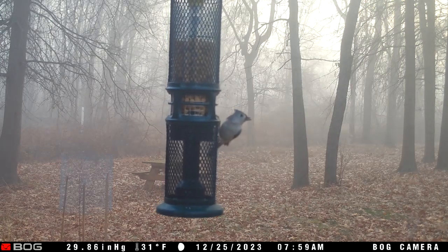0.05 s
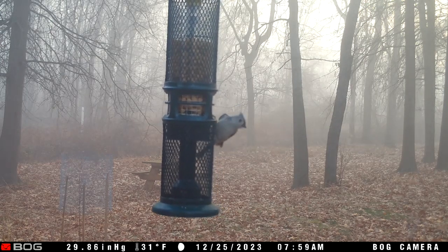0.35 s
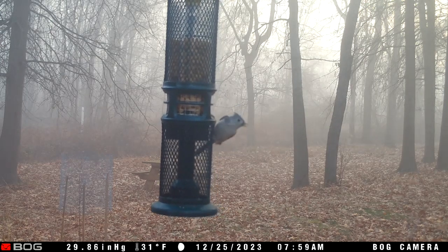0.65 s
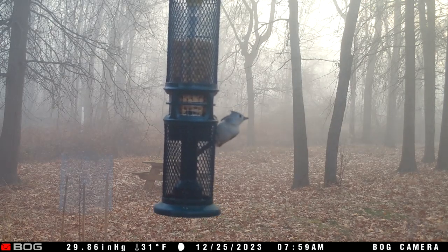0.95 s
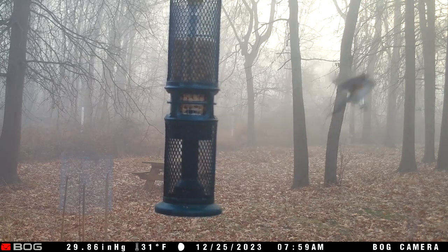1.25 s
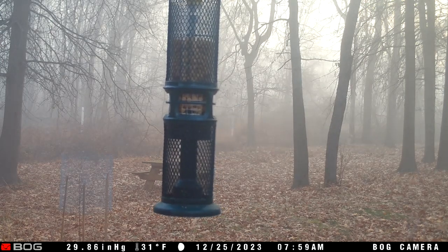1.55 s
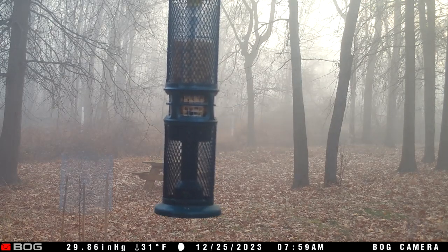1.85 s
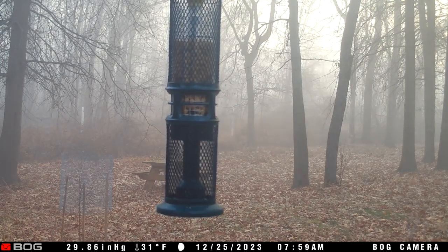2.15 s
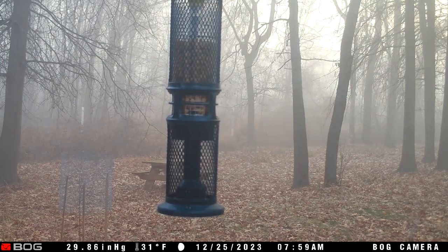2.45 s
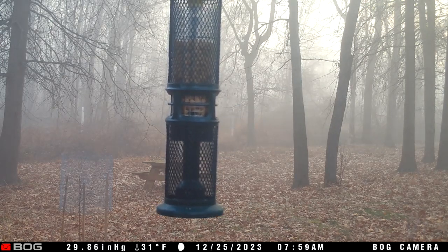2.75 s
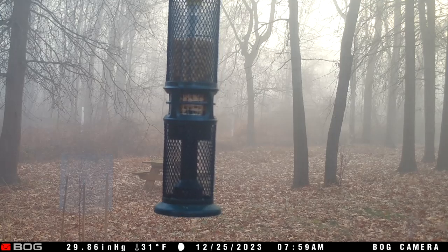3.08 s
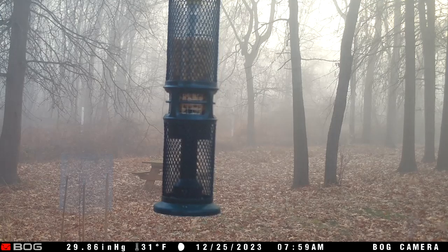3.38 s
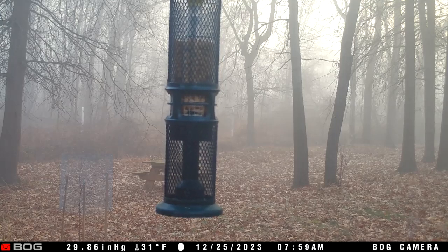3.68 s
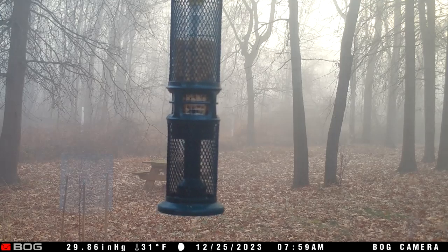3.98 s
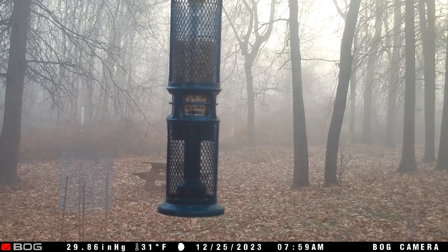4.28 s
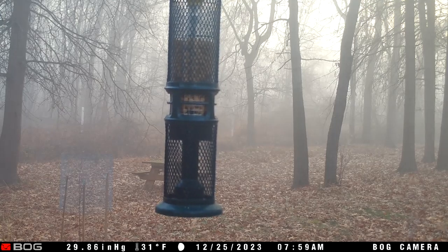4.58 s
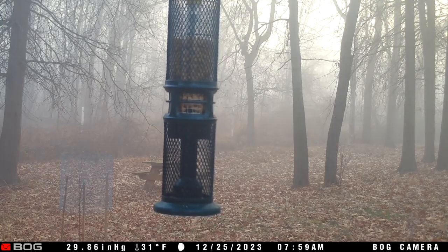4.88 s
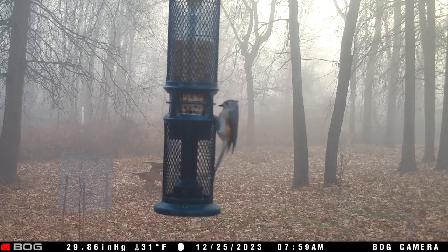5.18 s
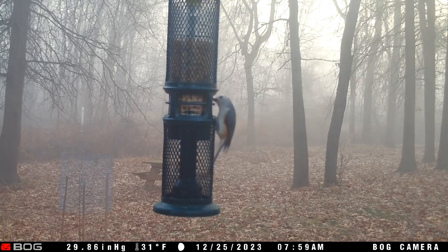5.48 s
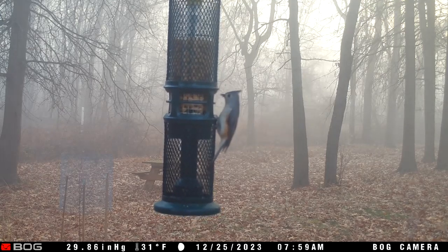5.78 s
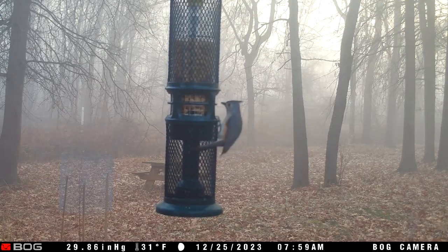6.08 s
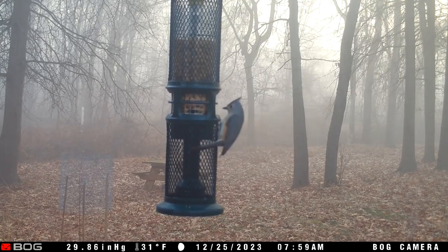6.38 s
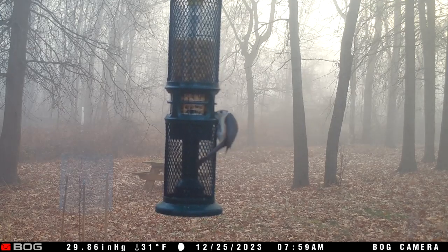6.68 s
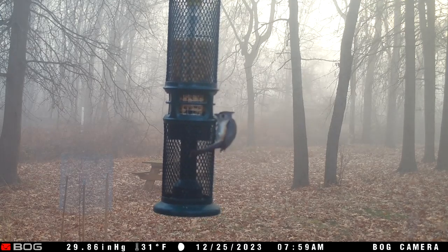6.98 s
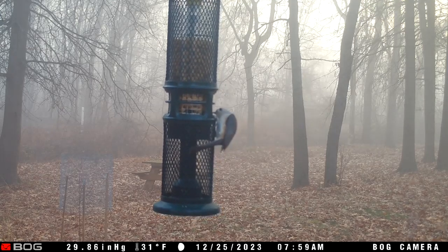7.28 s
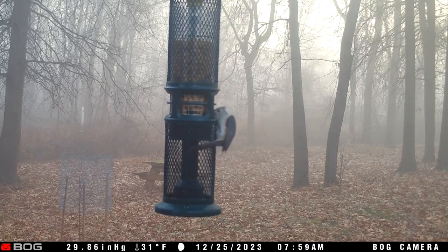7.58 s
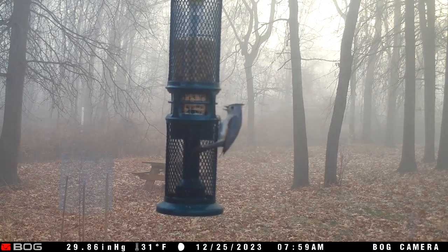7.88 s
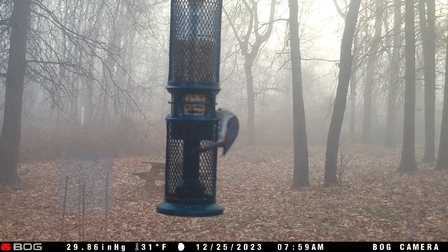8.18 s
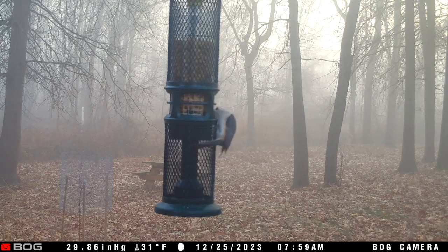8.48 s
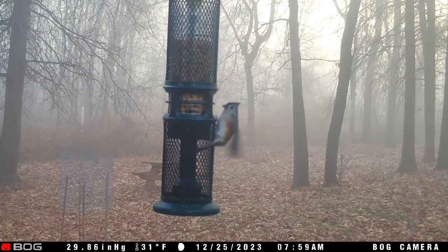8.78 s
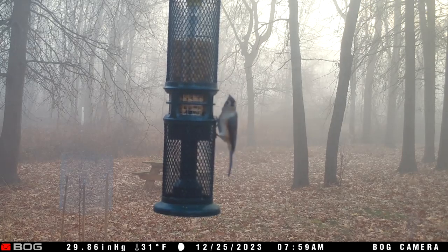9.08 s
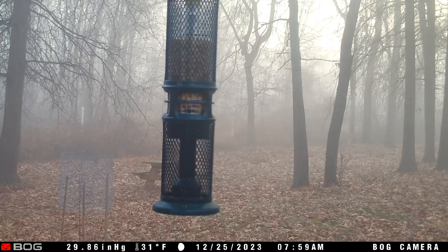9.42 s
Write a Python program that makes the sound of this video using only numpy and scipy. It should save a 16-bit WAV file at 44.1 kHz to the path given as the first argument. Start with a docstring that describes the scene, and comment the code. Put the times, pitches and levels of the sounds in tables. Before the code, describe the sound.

In a quiet wood, small birds scold back and forth in repeated raspy, buzzy notes. One is near the microphone at a seed feeder, opening with a high whistle and sharp chip and repeating them about halfway, louder. Farther birds keep up a softer nasal chatter with a short echo, and continue after the near one stops. Claws tick lightly on the feeder and wings flutter briefly a few times over soft, steady air.

```python
"""Small tits scolding in a winter wood

One bird calls by a seed feeder, others answer from the trees. Thin whistles plunge into a sharp 'chick',
then come strings of buzzy 'dee' notes: two coupled voices of one syrinx. Claws tap the feeder and wings
flutter over the soft hush of the wood, and the trunks throw back a short echo."""
import sys
import numpy as np
from scipy import signal
from scipy.fft import rfft, irfft
from scipy.io import wavfile
from scipy.ndimage import uniform_filter1d

SR = 44100
rng = np.random.default_rng(int(sys.argv[2]) if len(sys.argv) > 2 else 0)


def digitize_waveform(pressure):
    """Quantize a signal to 16-bit integers and store it at the path in sys.argv[1].

    Rows of a 2-D input are taken as channels; values are limited to [-1, 1].
    """
    field = np.atleast_2d(pressure).T
    bounded = np.clip(field, -1, 1)
    quanta = np.round(bounded * 32767).astype(np.int16)
    wavfile.write(sys.argv[1], SR, quanta)


N = 425565

# Distant air with a faint hiss on top. Each row: frequency in Hz, gain in dB.
HUSH_COLOUR = [(20, -23), (60, -13), (150, -8), (400, -3.5), (850, 1), (1300, 2.5), (2000, -3), (2900, -3),
               (4500, -18), (6000, -28), (8000, -36), (10000, -35), (16000, -35)]
# The resonance of throat and bill. Each row: frequency in Hz, gain in dB.
THROAT_COLOUR = [(500, -37), (1000, -23.5), (1500, -17), (2000, -7), (2800, 3.5), (3500, -2), (4300, -5),
                 (5500, -16), (7000, -45.5), (8500, -67.5), (16000, -85)]
# Thin 'seet' whistles. Each row: start and end in seconds, top pitch in Hz, level in dB,
# time constant of the closing droop in seconds.
SEET_CALLS = [(-.05, 0.092, 8470, -51.5, .004), (0.157, 0.306, 8700, -72, 0.0022),
              (.338, 0.46, 8400, -69.5, .016), (5.359, 5.527, 8620, -57, 0.0036)]
# Whistles that dive into a 'chick'. Each row: start and plunge in seconds, whistle and chick levels
# in dB, pitch at which it flares in Hz, flare boost in dB, peak of the overload crackle in dB.
CHICK_CALLS = [(.131, .2123, -49, -25, 5800, 11, -47.5), (5.57, 5.6485, -53.5, -22, 3900, 5, -35)]
# A brief broadband crackle of microphone overload. Each row: frequency in Hz, gain in dB.
OVERLOAD_COLOUR = [(150, -7), (600, 13), (3000, 1), (7000, -14), (12000, -4), (16000, -12)]
# Dees by the feeder. Each row: start and end in seconds, level in dB, upper and lower voice in Hz,
# climb as a share of pitch, crest as a share of length, drop as a share of pitch.
FEEDER_DEES = [(0.212, 0.331, -30, 1422, 816, 0.13, 0.84, 0.23),
               (.382, 0.531, -30, 1553, 866, 0.19, 0.89, 0.14),
               (.606, .754, -29.6, 1595, 869.5, .22, .69, .01),
               (.842, 0.996, -30.5, 1577, 900, 0.24, .56, 0.049),
               (2.552, 2.717, -31, 1560, 873, .15, 0.83, .22),
               (2.773, 2.944, -30.5, 1580, 872, 0.23, 0.7, 0.061),
               (3.023, 3.186, -30, 1624, 868, 0.27, 0.76, 0.085),
               (3.808, 3.961, -31, 1600, 873, .25, .79, 0.044),
               (4.085, 4.228, -31, 1627, 902.5, .25, .82, .23),
               (4.349, 4.489, -31, 1618, 866, 0.22, 0.75, 0.047),
               (5.653, 5.755, -28.5, 1408, 813, 0.14, 0.81, 0.36),
               (5.889, 6.026, -26, 1517, 877, .19, 0.63, 0.45)]
# Sum and difference tones of the two voices. Each row: multiple of the upper voice, multiple of the
# lower voice, weight in dB for the near bird, weight in dB for the far birds.
SYRINX_TONES = [(0, 1, -31, -21.5), (1, 0, -14.5, -16), (0, 2, -16, -10.5), (2, -1, -19, -27),
                (-1, 4, -21.5, -39), (1, 1, -10.5, -17.5), (0, 3, -4.5, -1.5), (3, -2, -15.5, -7),
                (-1, 5, -6, -8), (2, 0, 2.5, 0.5), (1, 2, -14, -19), (0, 4, -12.5, -12.5),
                (3, -1, -30, -20.5), (2, 1, -15.5, -8.5), (1, 3, -18.5, -11.5), (0, 5, -15.5, -14),
                (3, 0, -12.5, -11), (2, 2, -22, -31.5), (1, 4, -26.5, -40.5), (0, 6, -24.5, -27),
                (3, 1, -38, -41), (2, 3, -28, -21.5), (4, 0, -45.5, -27), (0, 7, -34, -33)]
# Turbulent breath. Each row: frequency in Hz, gain in dB.
RASP_COLOUR = [(600, -30.5), (1500, -8.5), (2400, 0.5), (3200, 5), (4400, -2.5), (5500, -10.5), (6800, -32),
               (8500, -45), (10000, -47), (16000, -75.5)]
# Dees from the trees. Each row: start and end in seconds, level in dB, upper and lower voice in Hz.
TREE_DEES = [(0.436, .623, -48.5, 1543, 925), (0.698, 0.887, -43, 1502, 920), (.962, 1.17, -42, 1517, 934),
             (1.22, 1.451, -43.5, 1509, 925), (1.553, 1.781, -42.5, 1520, 933),
             (1.842, 2.069, -42.5, 1533, 935), (2.137, 2.373, -42.5, 1538, 943.5),
             (2.841, 3.034, -44.5, 1497, 898), (3.069, 3.257, -43, 1515, 936),
             (3.302, 3.496, -42.5, 1536, 933), (3.535, 3.731, -41.5, 1530, 931),
             (4.03, 4.195, -40, 1518, 913), (4.206, 4.421, -41.5, 1440, 893),
             (4.474, 4.694, -43.5, 1436, 883), (4.74, 4.927, -42, 1515, 921),
             (5.055, 5.239, -51.5, 1428, 836), (5.225, 5.426, -40.5, 1508, 923),
             (5.335, 5.513, -47.5, 1490, 918), (5.516, 5.729, -39.5, 1568, 944),
             (5.791, 5.979, -38.6, 1588, 923), (6.169, 6.354, -42, 1495, 888),
             (6.43, 6.597, -42, 1498, 883), (6.616, 6.843, -50.5, 1490, 892),
             (6.803, 6.977, -41, 1534, 902), (6.916, 7.09, -47.6, 1365, 847),
             (7.033, 7.236, -43, 1475, 870), (7.278, 7.488, -40.5, 1471, 902),
             (7.692, 7.881, -41, 1473, 886), (8.045, 8.241, -40.5, 1474, 901),
             (8.302, 8.532, -41.6, 1515, 935.5), (8.599, 8.841, -41, 1561, 979),
             (8.913, 9.17, -39, 1521, 958), (9.28, 9.476, -39.5, 1545, 944)]
# Faint contact pips. Each row: midpoint in seconds, pitch in Hz, level in dB.
CONTACT_PIPS = [(.908, 7540, -66), (1.178, 7230, -67), (1.887, 7400, -69), (2.243, 7290, -68)]
# Claws and bill on the feeder. Each row: time in seconds, peak in dB, resonance in Hz.
FEEDER_TAPS = [(1.169, -31, 2600), (1.215, -37, 2400), (1.254, -28.5, 1800), (5.021, -42, 1600),
               (5.046, -39, 2860), (6.729, -45, 4130), (7.622, -44, 4550), (9.231, -42, 1800),
               (9.267, -38.5, 1600)]
# Hops to and from the feeder. Each row: start and length in seconds, first stroke's peak in dB.
SHORT_FLIGHTS = [(1.21, 0.21, -36.5), (3.071, 0.13, -39.5), (5.006, 0.052, -42), (9.227, 0.12, -37)]
# Air through feathers. Each row: frequency in Hz, gain in dB.
FEATHER_COLOUR = [(60, -29), (220, -17.5), (450, -7.5), (900, -6), (1600, -11), (3500, -9.5), (8000, -60)]
# Echo among the trunks. Each row: frequency in Hz, time to fade by 60 dB in seconds.
WOOD_DECAY = [(300, 0.66), (2800, 0.28), (5000, 0.41), (9000, 0.092)]


def gain_of(db):
    """Decibels to a gain."""
    return 10 ** (np.asarray(db) / 20)


def unit_rms(x):
    """Scales to rms 1."""
    return x / np.sqrt(np.mean(x ** 2) + 1e-20)


def curve_at(points, hz):
    """Reads a curve on a log-frequency axis."""
    f, value = np.transpose(points)
    return np.interp(np.log(np.abs(hz) + 1), np.log(f + 1), value)


def add(mix, start, sound):
    """Mixes a sound in at a time in seconds."""
    part = mix[max(round(start * SR), 0):][:len(sound)]
    part += sound[:len(part)]


def coloured(x, colour):
    """Shapes a sound with an EQ curve."""
    return irfft(rfft(x) * gain_of(curve_at(colour, np.fft.rfftfreq(len(x), 1 / SR))), len(x))


def noise(colour, size):
    """Coloured noise of rms 1."""
    return unit_rms(coloured(rng.standard_normal(size), colour))


def wander(rate_hz, size):
    """Smooth random drift of rms 1, rolled off above a rate."""
    hz = np.fft.rfftfreq(size, 1 / SR)
    return unit_rms(irfft(rfft(rng.standard_normal(size)) * (hz > 0) / (1 + (hz / rate_hz) ** 4), size))


def add_puff(mix, start, peak_db, colour, rise, decay, tail):
    """Mixes in a short noise burst with a weaker, slower tail."""
    lead_s = .004
    t = np.maximum(np.arange(4096) / SR - lead_s, 0)
    envelope = (1 - np.exp(-t / rise)) * (np.exp(-t / decay) + tail * np.exp(-t / (5 * decay)))
    puff = coloured(rng.standard_normal(len(t)) * envelope, colour)
    add(mix, start - lead_s, gain_of(peak_db) * puff / abs(puff).max())


def hush():
    """A bed of distant air in the trees, swelling very slightly."""
    return gain_of(-54.5 + .53 * wander(6.9, N)) * noise(HUSH_COLOUR, N)


def whistle(t, hz, db, scoop=.1):
    """One voice scoops up to pitch; on low notes its octave hits the throat's resonance and takes over."""
    pitch = hz * (1 - scoop * np.exp(-t / .005)) * (1 + .002 * wander(200, len(t)))
    phase = 2 * np.pi * np.cumsum(pitch) / SR
    root = gain_of(curve_at(THROAT_COLOUR, pitch))
    octave = gain_of(curve_at(THROAT_COLOUR, 2 * pitch) + 5.5)
    tone = np.sqrt(2) * (root * np.sin(phase) + octave * np.sin(2 * phase)) / np.hypot(root, octave)
    return tone * gain_of(db) * signal.windows.tukey(len(t), .1)


def seets():
    """High whistles that creep upwards and droop at the very end."""
    out = np.zeros(N)
    for start, end, top_hz, db, droop_s in SEET_CALLS:
        t = np.arange(0, end - start, 1 / SR)
        creep = .076 * (1 - t / t[-1]) ** 2
        droop = .28 * np.exp((t - t[-1]) / droop_s)
        add(out, start, whistle(t, top_hz * (1 - creep - droop), db)[start + t >= 0])
    return out


def chicks():
    """A held whistle dives over two octaves into a loud chick; a noise burst plays microphone overload."""
    top_hz, bottom_hz = 7820, 1360
    tip_s, land_s, hold_s = .0052, .0028, .026  # easing into the dive, easing out, time left after it
    fade_db_per_s = 453
    register_break = (2180, -3.5)  # Hz, dB: a dip where the octave takes over
    out = np.zeros(N)
    for start, plunge, whistle_db, chick_db, flare_hz, flare_db, overload_db in CHICK_CALLS:
        t = np.arange(0, plunge - start + hold_s, 1 / SR)
        since = start + t - plunge
        fallen = .5 + .5 * np.tanh(.5 * since / np.where(since < 0, tip_s, land_s))
        hz = top_hz + (bottom_hz - top_hz) * fallen
        push = np.clip((fallen - .12) / .47, 0, 1)
        db = whistle_db + (chick_db - whistle_db) * push - fade_db_per_s * np.maximum(since, 0)
        for at_hz, change_db in (flare_hz, flare_db), register_break:
            db += change_db * np.exp(-(np.log(hz / at_hz) / .11) ** 2)
        add(out, start, whistle(t, hz, db))
        add_puff(out, plunge, overload_db, OVERLOAD_COLOUR, rise=.00041, decay=.0018, tail=.044)
    return out


def dee(length, db, upper_hz, lower_hz, climb, crest, drop, hoarse, tone_db, jitter, shimmer_db, rasp_db,
        attack, release, swell_db, sag_db, bright_db, opening_db):
    """Two voices arch in pitch and modulate each other into a buzzy comb of sum and difference tones."""
    t = np.arange(0, length, 1 / SR)
    progress, size = t / t[-1], len(t)
    sag = climb * np.maximum(1 - progress / crest, 0) ** 2
    sag += drop * np.maximum((progress - crest) / (1 - crest), 0) ** 2
    pitch = np.array([upper_hz * (1 - sag), lower_hz * (1 - .85 * sag)])
    # the voices share a slow waver, and each has its own fast jitter
    waver = 1 + .0038 * wander(35, size)
    roughness = hoarse * jitter * np.array([wander(290, size), wander(220, size)])
    phase = 2 * np.pi * (np.cumsum(pitch * (waver + roughness), 1) / SR + rng.random((2, 1)))
    voice = np.zeros(size)
    for multiples, weight_db in zip(np.array(SYRINX_TONES)[:, :2], tone_db):
        hz = multiples @ pitch
        # each tone slides along the throat's resonance, and an opening bill brightens the note
        slide_db = .48 * (curve_at(THROAT_COLOUR, hz) - curve_at(THROAT_COLOUR, hz.max()))
        tilt_db = (bright_db + opening_db * (progress - .5)) * np.log2(hz / (2 * upper_hz))
        flutter_db = hoarse * shimmer_db * wander(38, size)
        tone = np.cos(multiples @ phase + rng.uniform(0, 2 * np.pi))
        voice += gain_of(weight_db + slide_db + tilt_db + flutter_db) * tone
    # turbulent air is chopped at the beat between the voices and grows towards the end
    chop = 1 + .75 * np.cos(2 * phase[1] - phase[0])
    rasp = noise(RASP_COLOUR, size) * chop * (.95 + .5 * progress)
    voice = unit_rms(voice) + hoarse * gain_of(rasp_db) * rasp
    # even air pressure holds the loudness steady from beat to beat; loudness and pitch sag together
    voice /= np.sqrt(uniform_filter1d(abs(signal.hilbert(voice)) ** 2, size=260) + 1e-6)
    envelope = np.sin(np.pi / 2 * np.minimum(t / attack, 1)) * np.minimum((t[-1] - t) / release, 1)
    return gain_of(db + swell_db * (progress - 1) - sag_db * sag) * envelope * unit_rms(voice)


def near_bird():
    """Loud, upfront dees that get hoarser and brighter as the bird strains upwards."""
    easy_hz = 1557
    out = np.zeros(N)
    for start, end, db, upper_hz, lower_hz, climb, crest, drop in FEEDER_DEES:
        strain_hz = upper_hz - easy_hz
        hoarse = np.clip(.68 + .00099 * strain_hz, .15, 1)
        note = dee(end - start, db, upper_hz, lower_hz, climb, crest, drop, hoarse,
                   tone_db=np.array(SYRINX_TONES)[:, 2], jitter=.008, shimmer_db=3.5, rasp_db=-10.5,
                   attack=.021, release=.012, swell_db=-1.5, sag_db=24,
                   bright_db=.0027 * strain_hz, opening_db=0)
        add(out, start, note)
    return out


def branches(x):
    """Five early reflections cut notches for the tones to glide through: each note wavers its own way."""
    paths = np.zeros(round(.012 * SR))
    paths[rng.integers(20, len(paths), size=5)] = .24 * rng.choice([-1, 1], size=5)
    paths[0] = 1
    heard = signal.fftconvolve(x, paths)
    return heard * np.linalg.norm(x) / np.linalg.norm(heard)


def far_birds():
    """Longer, more nasal dees that climb from one resting pitch, hoarser when the lower voice is deep."""
    rest_hz, usual_lower_hz = 1255, 912
    out = np.zeros(N)
    for start, end, db, upper_hz, lower_hz in TREE_DEES:
        hoarse = np.clip(.47 + .0026 * (usual_lower_hz - lower_hz), .15, 1)
        note = dee(end - start, db, upper_hz, lower_hz,
                   climb=1 - rest_hz / upper_hz, crest=.75, drop=.04, hoarse=hoarse,
                   tone_db=np.array(SYRINX_TONES)[:, 3], jitter=.012, shimmer_db=5, rasp_db=-4.5,
                   attack=.02, release=.019, swell_db=1.5, sag_db=19, bright_db=-.06, opening_db=2)
        add(out, start, branches(note))
    return out


def pips():
    """Tiny falling whistles that swell and fade."""
    length_s, fall_hz_per_s = .036, 16000
    out = np.zeros(N)
    t = np.arange(0, length_s, 1 / SR)
    for middle, hz, db in CONTACT_PIPS:
        glide = hz - fall_hz_per_s * (t - length_s / 2)
        add(out, middle - length_s / 2, whistle(t, glide, db, scoop=0) * np.hanning(len(t)))
    return out


def taps():
    """Dry ticks of claw and bill on the feeder, each with one broad resonance."""
    out = np.zeros(N)
    for start, db, hz in FEEDER_TAPS:
        colour = [(hz / 12, -40), (hz / 3, -10), (hz, 0), (5000, -20), (7500, -50)]
        add_puff(out, start, db, colour, rise=.001, decay=.004, tail=.06)
    return out


def wings():
    """A steady flutter: each downstroke puffs air through the feathers, and a softer upstroke follows."""
    beats_per_s, upstroke_s, upstroke_db = 25, .015, -4.5
    out = np.zeros(N)
    for start, length, db in SHORT_FLIGHTS:
        for t in np.arange(0, length, 1 / beats_per_s):
            beat_db = db - 6 * (t / length) ** 3  # weaker as the bird leaves or settles
            for at, stroke_db in (t, beat_db), (t + upstroke_s, beat_db + upstroke_db):
                add_puff(out, start + at, stroke_db, FEATHER_COLOUR, rise=.0014, decay=.0054, tail=.54)
    return out


def wood_echo(x):
    """Sparse echoes from trunks and ground, each band dying at its own speed."""
    size, echoes_per_s, predelay_s = SR // 2, 1500, .006
    echoes = rng.standard_normal(size) * (rng.random(size) < echoes_per_s / SR)
    echoes *= np.arange(size) > predelay_s * SR
    hz, t, bands = signal.stft(echoes, SR, nperseg=256)
    fade = gain_of(-60 * t / curve_at(WOOD_DECAY, hz)[:, None])
    tail = signal.istft(bands * fade, SR, nperseg=256)[1]
    return signal.fftconvolve(x, tail / np.linalg.norm(tail))[:N]


def scene():
    """A mono mix over the hush: the feeder sits fairly dry in front, the far birds are wetter."""
    close = near_bird() + seets() + chicks() + pips() + wings() + taps()
    far = far_birds()
    echo_send = gain_of(-19) * close + gain_of(-15) * far
    return (close + far + wood_echo(echo_send) + hush())[None]


def record(dry):
    """A steep low-pass trims the very top."""
    lowpass = signal.firwin(511, cutoff=15800, window=("kaiser", 9), fs=SR)
    return signal.oaconvolve(dry, lowpass[None], "same")


dry = scene()
out = record(dry)
digitize_waveform(out)
```